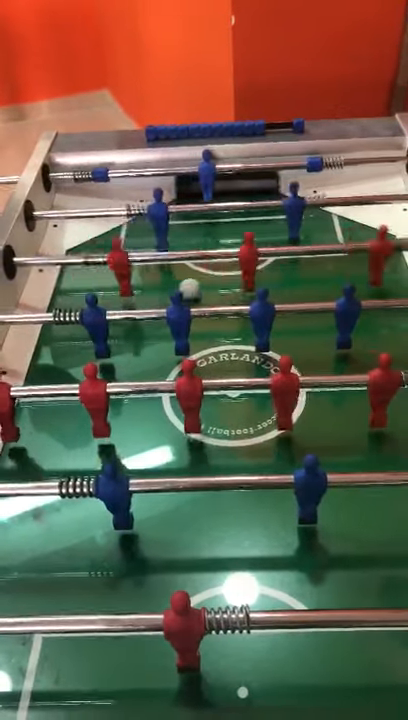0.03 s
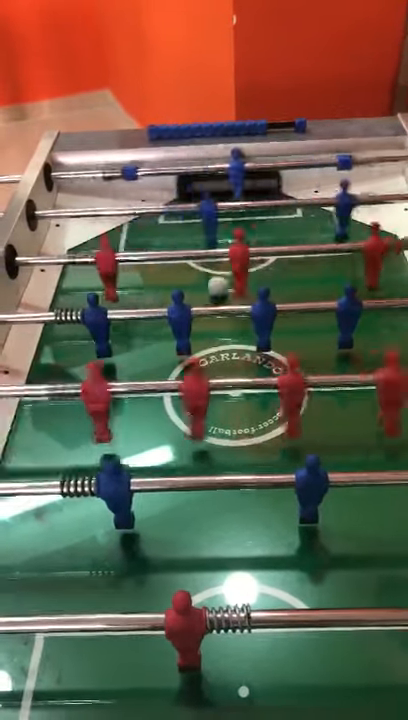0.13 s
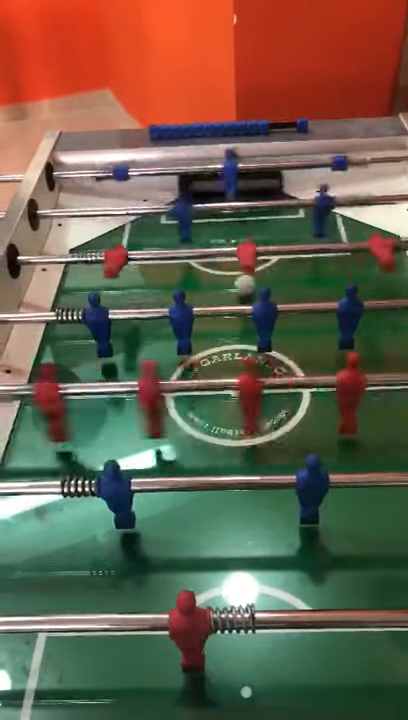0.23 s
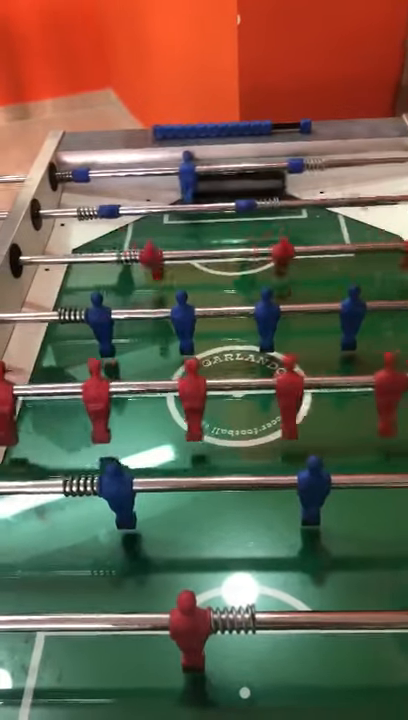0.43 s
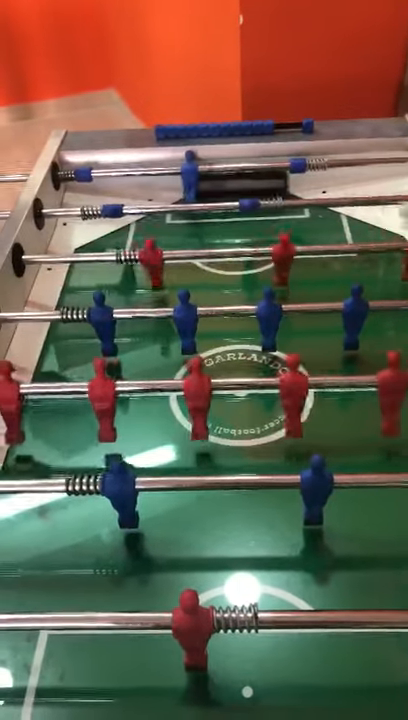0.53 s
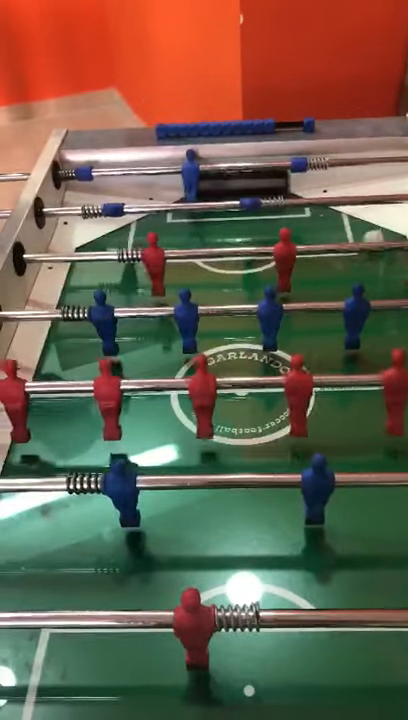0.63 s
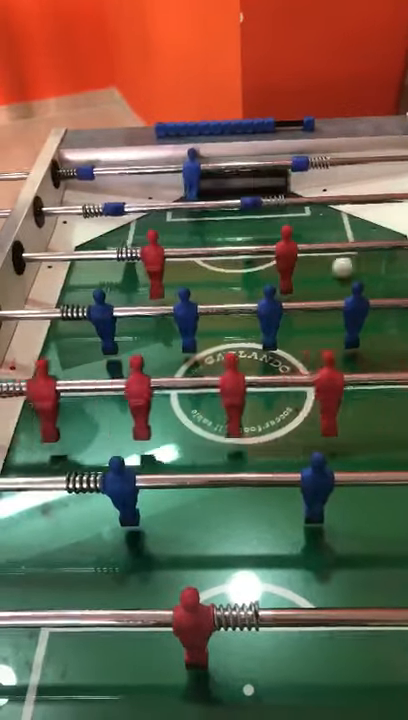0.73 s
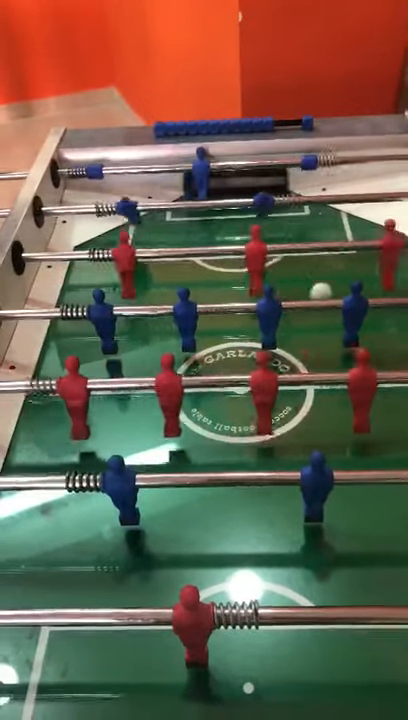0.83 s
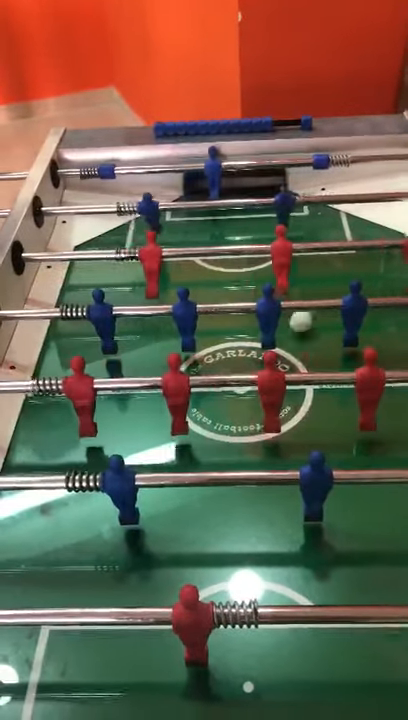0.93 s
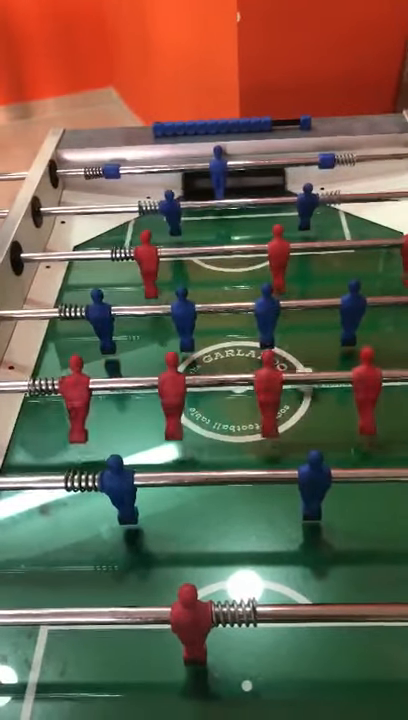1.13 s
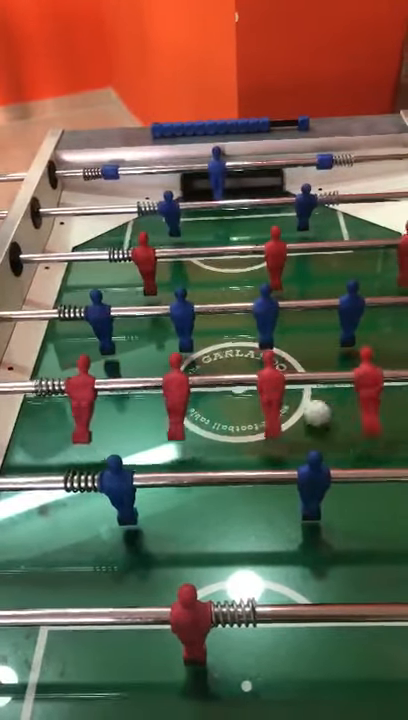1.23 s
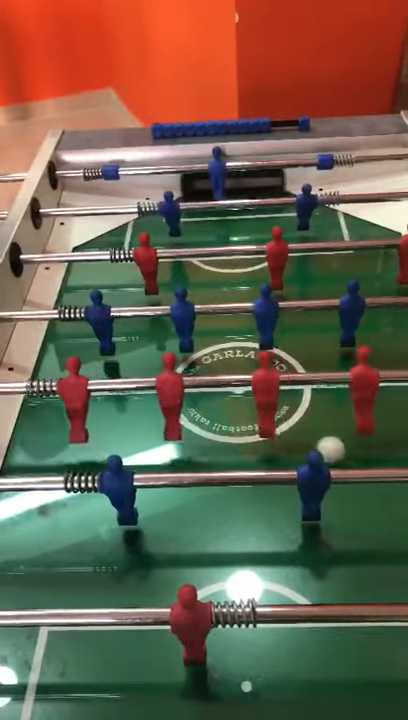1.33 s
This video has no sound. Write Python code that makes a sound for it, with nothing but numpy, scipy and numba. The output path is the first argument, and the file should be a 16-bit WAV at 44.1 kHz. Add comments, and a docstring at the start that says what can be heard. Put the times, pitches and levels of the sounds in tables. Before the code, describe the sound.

A hard table football shot is heard from the end of the table: a sharp crack, hollow thuds and rattling rods, then fading clacks as the ball bounces and rolls. The bare room rings with the blows.

```python
"""A hard table-football shot in a bare, echoing room, heard from the end of the table.
The room still rings from earlier play while the ball rumbles softly over the field. After a faint tick,
a figure cracks against the ball; ball and rod slam into the cabinet, whose panels thud and ring.
Loose rods chatter, the ball clacks about and rolls on, and the room rings for over a second.
A fast limiter holds the loudest blows down."""
import sys
import numpy as np
from scipy import signal
from scipy.fft import rfft, irfft
from scipy.io import wavfile
from scipy.ndimage import uniform_filter1d
from numba import njit

SR = 44100
rng = np.random.default_rng(int(sys.argv[2]) if len(sys.argv) > 2 else 0)


def persist_wave(psi):
    """Save psi, clipped to +-1, as 16-bit WAV."""
    counts = np.round(np.clip(psi, -1, 1) * 32767).astype(np.int16)
    wavfile.write(sys.argv[1], SR, np.atleast_2d(counts).T)


N = 61739

# The bare room's reverb. Each row: band centre in Hz, relative starting level in dB, t60 in seconds.
ROOM_BANDS = [(30, -31, 1.2), (63, 0, 1.07), (130, -2, 1.31), (300, -1.5, 1.43), (516, -2.5, 1.58),
              (662, 2, 1.64), (880, -2, 1.65), (1360, -3.5, 1.8), (2300, -8.5, 1.505), (2980, -9.5, 1.474),
              (4150, -15, 1.18), (5230, -14, 1.08), (8060, -16.5, 0.79), (11800, -20.5, 0.47)]


def undb(db):
    return 10 ** (np.asarray(db) / 20)


def unit(x):
    """Scale to rms 1."""
    return x / np.sqrt(np.mean(x ** 2))


def fade(t60):
    """Exponential decay that falls 60 dB in t60 seconds."""
    return np.exp(-np.log(1000) * np.arange(N) / SR / max(t60, 1 / SR))


def at(x, start_s):
    """Place x on the timeline at start_s."""
    return np.concatenate([np.zeros(max(int(start_s * SR), 0)), x])[:N]


def octaves():
    """Log2 frequency of each spectral bin."""
    return np.log2(np.maximum(np.arange(N // 2 + 1) * SR / N, 1))


def colour(points):
    """EQ curve through (Hz, dB) points, as a gain for each bin."""
    p = np.array(points)
    return undb(np.interp(octaves(), np.log2(p[:, 0]), p[:, 1]))


def hump(at_octave, hz, width):
    """Bell curve that peaks at hz and halves width octaves to either side."""
    return 1 / (1 + ((at_octave - np.log2(hz)) / width) ** 2)


def noise(gain):
    """Noise of rms 1 with the given spectrum."""
    return unit(irfft(rfft(rng.standard_normal(N)) * gain, N))


def burst(gain, t60):
    """Many close, quickly damped modes struck at once; starts near rms 1."""
    envelope = fade(t60)
    strike = rfft(rng.standard_normal(N) * envelope)
    # A minimum-phase filter colours the strike and keeps its attack sharp.
    cepstrum = irfft(np.log(gain + 1e-6), N)
    tone = np.exp(rfft(cepstrum * (1 + np.sign(np.fft.fftfreq(N)))))
    hit = irfft(strike / np.abs(strike) * tone, N)
    hit[N // 2:] = 0
    return unit(hit) * np.sqrt(np.mean(envelope ** 2))


def room_tail(spectrum):
    """Diffuse reverb with the given starting colour; the treble dies first."""
    wash = rfft(noise(colour(spectrum)))
    centres = np.log2([hz for hz, _, _ in ROOM_BANDS])
    tail = 0
    for solo, (_, _, t60) in zip(np.eye(len(ROOM_BANDS)), ROOM_BANDS):
        band = irfft(wash * np.interp(octaves(), centres, solo), N)
        tail += band * fade(t60)
    return tail


def earlier_play(level_db=-28):
    """The room still rings from the play before the shot."""
    # Each row: frequency in Hz, relative level of the lingering reverb in dB.
    tail_eq = [(30, -16), (60, -2), (130, -12), (350, 1.5), (800, 1), (1400, -1.5), (2200, 0), (3100, -6),
               (4200, -16), (6000, -26), (8000, -36), (12000, -40)]
    return undb(level_db) * room_tail(tail_eq)


def rolling(level_db=-39, bumps_hz=25, bumps_db=3):
    """The ball rumbles unevenly over the playing field."""
    # Each row: frequency in Hz, relative level of the rumble in dB.
    rumble_eq = [(30, -41), (65, 0.5), (150, 1), (300, -0.5), (700, -1), (1400, -9.5), (3000, -20),
                 (6000, -31), (12000, -43.5)]
    bumps = noise(1 / (1 + (2 ** octaves() / bumps_hz) ** 2))
    return undb(level_db + bumps_db * bumps) * noise(colour(rumble_eq))


def clack(hz, width, t60, resonance_width_hz=75, steepness=1.2):
    """One hard contact, brightest around hz, rings the plastic of ball and figures."""
    # Each row: resonance of the plastic in Hz, boost in dB.
    plastic = [(1250, 4), (1900, 6), (2320, 4.5), (2730, 8), (3300, 7.5), (3900, 4), (4750, 5), (5250, 4),
               (5950, 5.5), (7550, 2.5), (8750, 1.5), (10200, 9.5)]
    pitch = octaves()
    ring = 1 + sum((undb(db) - 1) / (1 + ((2 ** pitch - peak_hz) / resonance_width_hz) ** 2)
                   for peak_hz, db in plastic)
    return burst(ring * hump(pitch, hz, width) ** steepness, t60)


def clacks():
    """The ball meets figures and walls; rods hit their stops."""
    # Each row: start in seconds, level in dB, brightest frequency in Hz, width in octaves,
    # t60 in seconds.
    contacts = [(0.175, -34, 6370, 1, 0.027), (0.2426, -7.5, 4200, 1.1, 0.017),
                (0.2494, -13, 9000, 3, 0.023), (0.2789, -8.5, 1600, 1.3, 0.01),
                (.2845, -7.5, 1200, 0.56, .014), (0.3967, -6.5, 3700, 1.0, 0.012),
                (0.4064, -9, 4540, 0.44, 0.033), (0.41, -11.5, 1460, 0.99, 0.028),
                (.4640, -10, 7960, 0.36, 0.013), (0.465, -7.5, 2530, 0.76, 0.014),
                (0.6337, -16, 5500, 1.9, 0.014), (.6365, -17, 1190, 0.28, 0.014),
                (.6440, -10, 1230, 0.43, 0.019), (0.7218, -11.5, 2568, 0.47, 0.021),
                (0.7871, -18, 2680, 0.39, 0.026), (.8870, -24, 2500, 0.27, 0.017),
                (0.9108, -27, 2280, 0.33, 0.017), (1.3146, -37, 4000, 0.8, 0.038),
                (1.3859, -27.5, 2850, 1.8, 0.042)]
    return sum(undb(db) * at(clack(hz, width, t60), start) for start, db, hz, width, t60 in contacts)


def room_echoes(predelay_s=0.013, build_s=0.0047):
    """The walls answer the blows a little late, each with a bloom of reverb."""
    # Each row: start of the blow in seconds, reverb level in dB.
    sends = [(.1757, -45.5), (.2440, -12), (.2780, -18), (0.4065, -17.5), (.4660, -13), (0.6336, -27.5),
             (0.7227, -37.5), (1.3145, -54), (1.3859, -44)]
    bloom = 1 - np.exp(-np.arange(N) / SR / build_s)
    return sum(undb(db) * at(room_tail(ROOM_BANDS) * bloom, start + predelay_s) for start, db in sends)


def cabinet(ring_db=-6.5, rise_cycles=1.3, detune=0.0017, thud_steepness=1.51):
    """Each heavy blow thuds in the panels and rings the cabinet modes near its pitch."""
    # Each row: start in seconds, level in dB, strongest frequency in Hz, width in octaves,
    # t60 of the thud in seconds.
    blows = [(.2430, -19.5, 710, 0.51, 0.082), (.2535, -1.5, 325, 1.21, 0.046),
             (.2600, -4.5, 127, 0.68, 0.078), (0.285, -8, 66.6, 0.59, 0.1), (.2970, -7.5, 604, 0.96, 0.127),
             (.3250, -11.5, 176, 1.1, 0.11), (.4160, -11, 173, 1.7, 0.18), (0.488, -23, 131, 1.2, 0.22)]
    # Each row: cabinet mode in Hz, relative level in dB, t60 in seconds.
    modes = [(65.2, -4, 1.69), (110.5, -18, 0.35), (123.5, -11, 1.11), (189, -7.5, 0.59), (233.5, -3, 0.73),
             (292.2, -4, 0.43), (317, -6, 0.65), (360.4, -16.5, .7), (386, -12, 0.87), (494, -7.5, 0.59),
             (606, -5.5, 0.95), (639.6, -6.5, 0.26)]
    t = np.arange(N) / SR
    out = 0
    for start, db, centre_hz, width, thud_t60 in blows:
        ring = 0
        for hz, mode_db, t60 in modes:
            detuned_hz = hz * (1 + detune * rng.standard_normal())
            attack = 1 - np.exp(-t * hz / rise_cycles)
            strength = undb(mode_db) * hump(np.log2(hz), centre_hz, width)
            ring += strength * attack * fade(t60) * np.sin(2 * np.pi * detuned_hz * t)
        thud = burst(hump(octaves(), centre_hz, width) ** thud_steepness, thud_t60)
        out += undb(db) * at(thud + undb(ring_db) * ring, start)
    return out


def chatter(start_s=0.275, t60=1, knocks_per_s=77, level_db=-19):
    """Loose rods and figures rattle in small random knocks that die away after the shot."""
    triggers = rng.random(N) < knocks_per_s / SR
    knocks = triggers * (2 * rng.random(N) - 1) * fade(t60)
    rattle = signal.fftconvolve(knocks, clack(hz=1700, width=0.99, t60=0.018))
    return undb(level_db) * at(rattle, start_s)


def scene():
    """The hits on the table, the room around them and the rolling ball, in mono."""
    hits = clacks() + cabinet() + chatter()
    return (hits + room_echoes() + earlier_play() + rolling())[None]


@njit
def peak_follower(x, release):
    """Jumps to each peak and sinks back."""
    out, level = np.empty(len(x)), 0.
    for i in range(len(x)):
        level = max(abs(x[i]), level * release)
        out[i] = level
    return out


def record(dry, low_cut_hz=41, limit_db=-2.5, release_s=0.045, high_cut_hz=11750):
    """The microphone loses the deep bass, a fast limiter ducks the peaks, and the top is cut."""
    low_cut = signal.butter(3, low_cut_hz, "high", fs=SR, output="sos")
    high_cut = signal.ellip(10, .2, 80, high_cut_hz, fs=SR, output="sos")
    mic = signal.sosfilt(low_cut, dry)
    peaks = peak_follower(mic[0], np.exp(-1 / (release_s * SR)))
    ducking = np.minimum(1, undb(limit_db) / (peaks + 1e-9))
    limited = mic * uniform_filter1d(ducking, size=64)
    return signal.sosfilt(high_cut, limited)


dry = scene()
out = record(dry)
persist_wave(out)
```